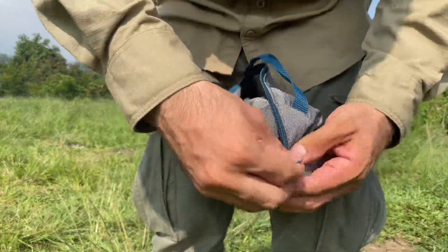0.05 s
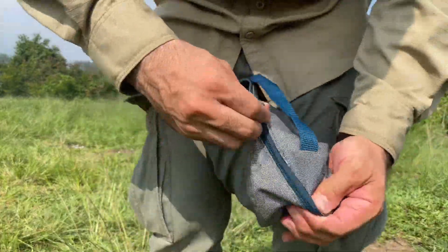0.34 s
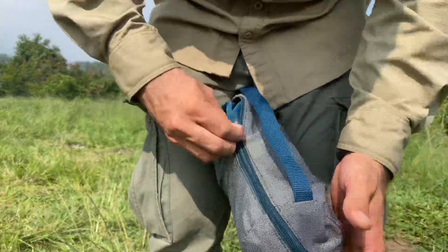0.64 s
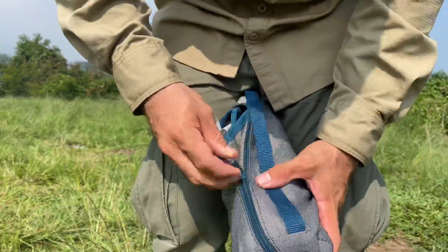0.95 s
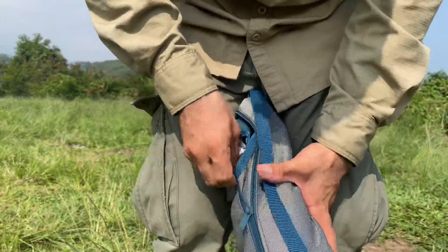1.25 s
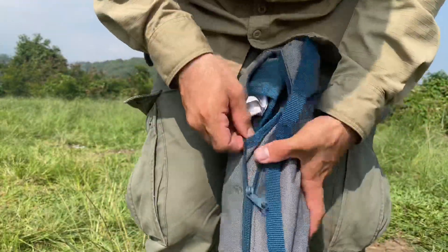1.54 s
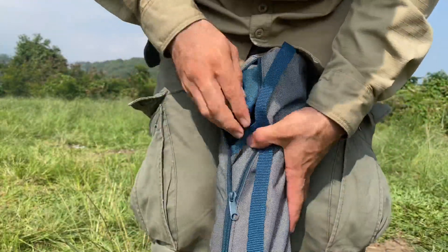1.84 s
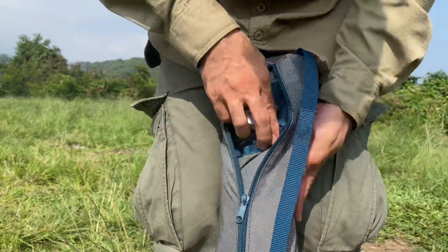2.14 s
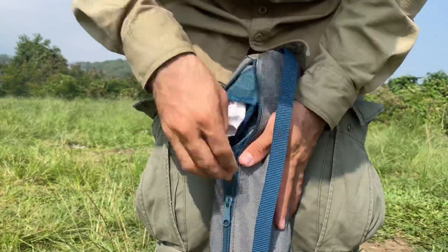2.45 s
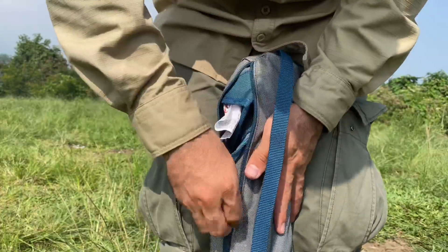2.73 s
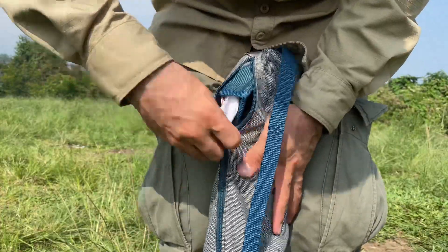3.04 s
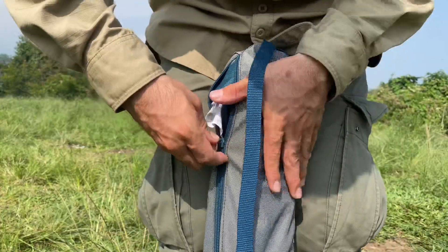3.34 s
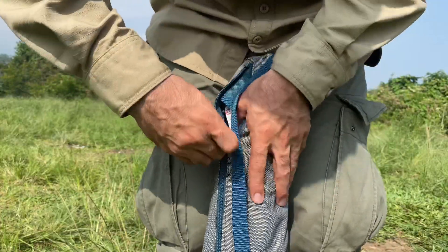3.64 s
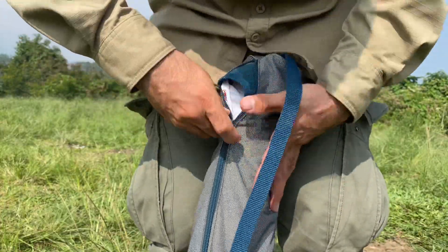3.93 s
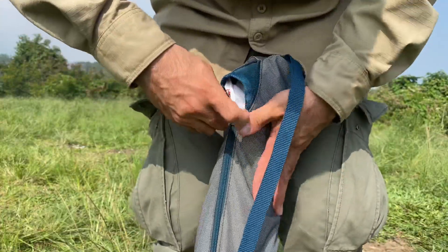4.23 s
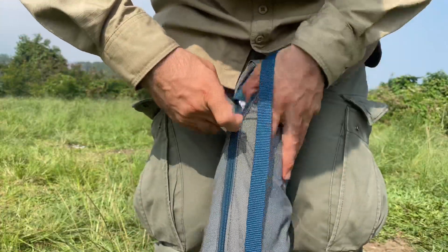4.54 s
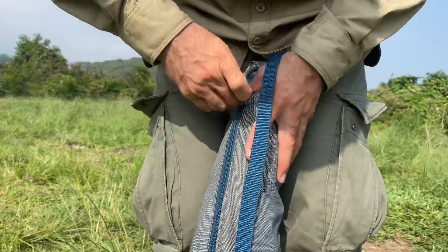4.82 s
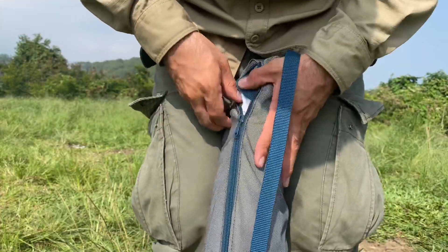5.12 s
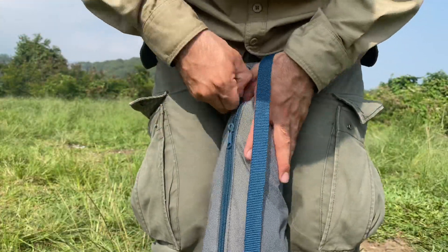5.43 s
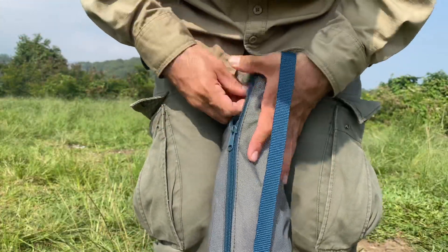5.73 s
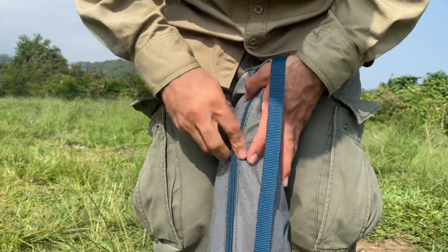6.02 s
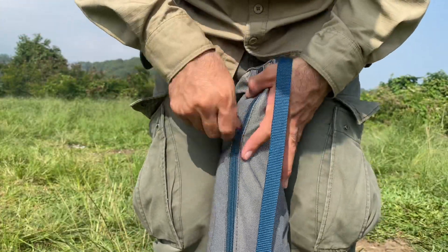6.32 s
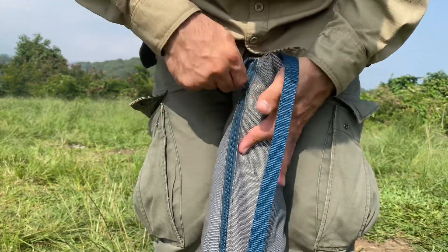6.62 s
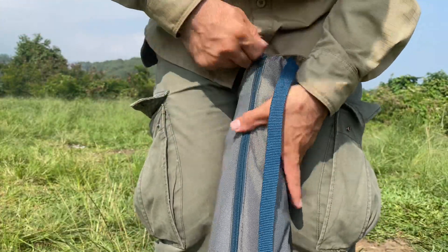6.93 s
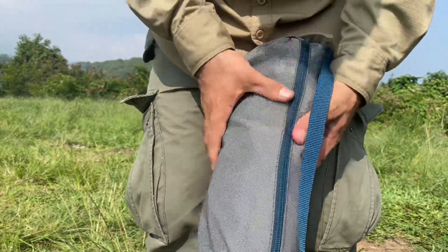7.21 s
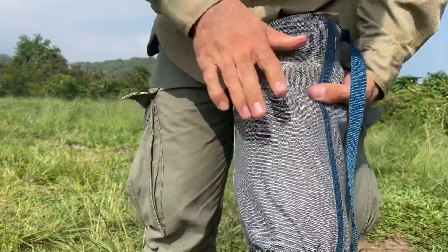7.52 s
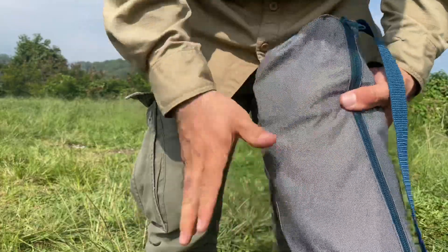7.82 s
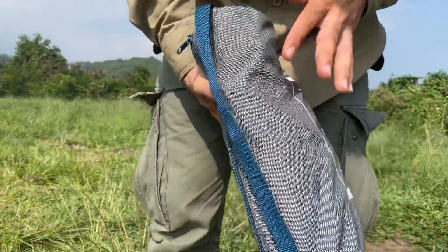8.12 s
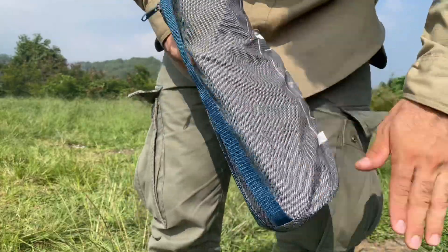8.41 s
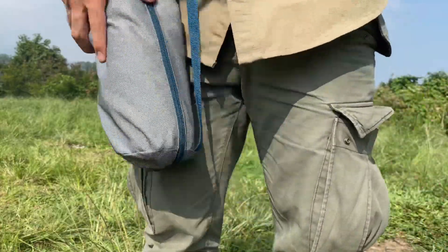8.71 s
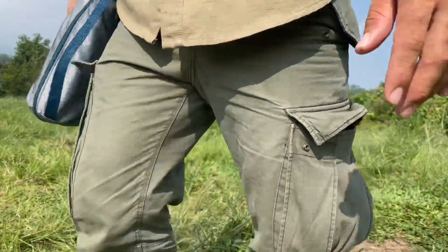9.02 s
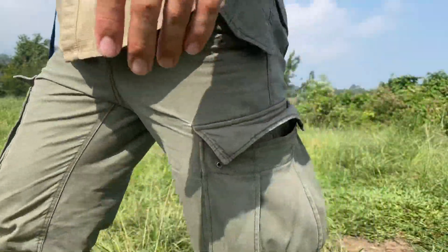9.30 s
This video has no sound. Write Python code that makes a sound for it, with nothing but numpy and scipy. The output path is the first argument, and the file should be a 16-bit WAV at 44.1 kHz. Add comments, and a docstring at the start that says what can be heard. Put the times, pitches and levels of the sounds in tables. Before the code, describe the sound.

Someone tugs a sticking zipper shut on a nylon bag, with close fabric rustling, jingling metal tabs and pats, over a light breeze.

```python
"""A meadow, a light breeze rumbling on a pair of microphones. Close by, someone works the sticking zip
of a nylon gear bag: the slider buzzes over the teeth, catches, and is tugged shut, brighter as the tape
pulls taut. Its metal tabs jingle and creases snap, while hands rub hiss and rustle out of the cloth.
Then the bag is smoothed, slapped with a dull boom and lifted away."""
import sys
import numpy as np
from scipy import signal
from scipy.fft import rfft, irfft, next_fast_len
from scipy.io import wavfile
from scipy.ndimage import uniform_filter1d, map_coordinates

SR = 44100
rng = np.random.default_rng(int(sys.argv[2]) if len(sys.argv) > 2 else 0)


def inscribe(sig):
    """Save sig as 16-bit PCM at rate SR to the path in sys.argv[1].

    A 1-D sig is mono; a 2-D sig holds one channel per row.
    Samples are clipped to [-1, 1] before scaling.
    """
    pcm = np.round(np.clip(np.atleast_2d(sig).T, -1, 1) * 32767)
    wavfile.write(sys.argv[1], SR, pcm.astype(np.int16))


N = 417186
TIME = np.arange(N) / SR

# The air: meadow wash, breeze rumble, deeper gusts. Each row: frequency in Hz, relative level in dB.
MEADOW_EQ = [(40, -35), (120, -2.5), (300, -4), (1000, -12.5), (3000, -21.5), (8000, -29), (15000, -75)]
BREEZE_EQ = [(15, -68), (30, -17), (48, -6), (66, 1), (95, -4), (140, -3.5), (220, -28.5), (500, -44)]
GUST_EQ = [(15, -29), (30, -13), (50, 2), (75, 1.5), (105, -6), (150, -15), (300, -43), (600, -59)]
# The breeze slackens, then freshens. Each row: time in seconds, lift in dB.
BREEZE_RIDE = [(0, 0.5), (2.3, 1.5), (4.2, -1), (5.4, 1), (6.2, 0), (7.2, 5.5), (9.46, 0.5)]
# Gusts buffet the microphones. Each row: centre in seconds, width in seconds, level in dB.
GUST_CUES = [(5.24, 0.11, -46), (5.37, 0.016, -39), (5.56, 0.064, -46), (5.82, 0.071, -42.5),
             (6.53, 0.22, -42), (6.83, 0.38, -42), (7.16, 0.068, -33), (7.27, 0.065, -40.5),
             (7.52, 0.034, -37), (7.67, 0.084, -37), (7.77, 0.099, -48), (7.93, 0.053, -46),
             (8.26, 0.058, -38), (8.43, 0.054, -47.5), (8.84, 0.06, -41.5), (8.97, 0.043, -51)]

# Sliding weave, bending folds and snapping creases. Each row: frequency in Hz, relative level in dB.
WEAVE_EQ = [(200, -15.5), (800, -3.5), (1600, -2.5), (2500, 0.5), (3700, 0), (5200, -4), (6400, -4),
            (7500, -5), (10200, -4.5), (11600, -8.5), (14800, -14), (16000, -43)]
FOLD_EQ = [(60, -61), (130, 2.5), (230, 0), (420, 2), (650, -4), (1100, -6.5), (1600, -10.5), (3000, -16.5),
           (8000, -69.5)]
CREASE_EQ = [(200, -16.5), (700, -11.5), (1500, 2), (2600, -2), (4200, -5.5), (7000, -14), (11000, -15.5),
             (15500, -22)]
# Stereo image of the cloth. Each row: frequency in Hz, likeness of left and right from 0 to 1.
CLOTH_LIKENESS = [(300, 0.94), (2000, 0.78), (4000, 0.77), (5200, 0.05), (6400, 0.4), (7400, 0),
                  (9400, 0.18), (10000, 0.64), (11200, .65), (12000, 1), (15000, 0.4)]
# The fingers never quite rest. Each row: time in seconds, activity in dB.
FIDGET_RIDE = [(0, -2), (1.8, 1.5), (2.55, -5), (2.72, -5.5), (3.06, -3.5), (3.7, -1), (4.2, -5.5),
               (5.1, -2.5), (5.72, -6), (6.25, -15), (7.3, 2.5), (8.17, -9), (8.6, -7.5), (9.46, -3.5)]
# A hand slides over the cloth. Each row: start and length in seconds, then relative hiss level,
# fold level and swell from start to end, all in dB.
STROKE_CUES = [(0.0, 0.043, -54.5, -51, 12), (0.119, 0.43, -52, -43, 6), (0.569, 0.14, -59.5, -48.5, -17),
               (0.695, 0.11, -57, -47, -2), (0.806, 0.35, -53, -51, 0), (1.157, 0.22, -53.5, -47.5, 2),
               (1.332, 0.38, -57.5, -56, -11), (1.708, 0.18, -64, -51.5, 2), (1.858, 0.11, -53, -52, 2),
               (2.018, 0.091, -65, -57, 5), (2.151, 0.13, -56.5, -48, -11), (2.267, 0.2, -57, -51, 7),
               (2.546, 0.11, -53.5, -44, -4), (2.837, 0.19, -55, -42, -8.5),
               (3.203, 0.24, -57.5, -47.5, -4), (3.462, 0.16, -62.5, -50.5, -10),
               (3.65, 0.16, -60, -43.5, 5), (3.786, 0.18, -57.5, -47.5, -10.5),
               (4.308, 0.12, -58.5, -51.5, 9), (4.417, 0.2, -58.5, -50, 2), (4.596, 0.16, -66, -50.5, -5),
               (4.803, 0.13, -62, -54, 3), (4.936, 0.2, -62, -48, -4), (5.2, 0.12, -59, -45.5, -5),
               (5.337, 0.21, -64.5, -54, -17), (5.517, .17, -57.5, -53, 17),
               (5.766, 0.16, -62, -51.5, -0.5), (5.958, 0.25, -67, -57.5, -5), (6.389, 0.1, -63, -54, -8),
               (6.482, 0.2, -56.5, -39, 0), (6.709, 0.069, -44, -41.5, -4), (6.758, 0.12, -53, -50.5, -16),
               (6.927, 0.27, -53.5, -50, 10), (7.133, 0.084, -57, -41.5, -9), (7.185, .18, -54, -53, -5),
               (7.392, 0.14, -57.5, -55, 14), (7.632, 0.09, -41, -33, -8), (7.693, 0.087, -38.5, -39, -1.5),
               (7.894, 0.044, -46, -34.5, -7), (7.914, 0.22, -52.5, -47.5, -3.5),
               (8.229, 0.077, -43.5, -40.5, -17), (8.288, 0.12, -42, -41.5, 7.5),
               (8.684, 0.19, -57.5, -49, -12.5), (8.842, 0.18, -61, -61, 5), (9.17, 0.28, -63, -56.5, -1)]
# A nail skates over the weave. Each row: centre and width in seconds, level in dB, ribs per second.
SCRAPE_CUES = [(2.224, 0.032, -39.5, 2150), (3.103, 0.017, -53.5, 4000), (6.756, 0.01, -49, 2100),
               (7.134, 0.028, -42, 2400), (7.685, 0.021, -42, 2000), (7.724, 0.023, -36.5, 5400),
               (7.991, 0.027, -42.5, 3100)]
# Dry ticks of slider, nails and creases. Each row: start in seconds, level in dB, decay in seconds,
# resonance in Hz.
TICK_CUES = [(1.099, -42, 0.0034, 1500), (1.115, -33, 0.00056, 2300), (1.214, -34.5, 0.0012, 2100),
             (1.288, -32, 0.0022, 2300), (1.302, -25, 0.0023, 1100), (1.421, -44, .0008, 2600),
             (1.826, -40, 0.0029, 1300), (2.044, -32.5, 0.00037, 2820), (2.104, -37.5, 0.0015, 1100),
             (2.296, -31, 0.00054, 3200), (2.306, -30, .0004, 2000), (2.337, -35, .0006, 3000),
             (2.351, -36, .0008, 2000), (2.570, -40, 0.001, 1800), (3.108, -35, 0.0021, 2200),
             (3.111, -32.5, 0.00076, 3600), (3.344, -46, .0007, 2410), (3.377, -35, .0008, 1800),
             (3.705, -40, .0004, 2900), (3.743, -41, .0004, 2400), (3.831, -35, 0.001, 1700),
             (3.881, -31.5, 0.0024, 2030), (3.908, -33, 0.0007, 2400), (4.046, -43.5, .0012, 1400),
             (4.248, -38, 0.0013, 2200), (4.479, -31.5, 0.0011, 2210), (4.512, -34.5, 0.0009, 3000),
             (4.53, -34, .002, 2500), (4.544, -42, 0.00036, 6000), (4.559, -30, 0.0006, 2700),
             (4.673, -42, .0012, 2200), (4.794, -40, .0004, 4040), (4.946, -34.5, 0.00093, 2000),
             (5.014, -35, .0006, 2500), (5.128, -44, .001, 1400), (5.247, -41, 0.00087, 2200),
             (5.272, -41, 0.0011, 1800), (5.282, -33, 0.0009, 1700), (5.318, -38, 0.00062, 2500),
             (6.028, -33.5, 0.0023, 1970), (6.22, -45, 0.00069, 3000), (6.317, -39.5, 0.0052, 2550),
             (6.716, -30, 0.0016, 2900), (7.028, -30, 0.0014, 3000), (7.157, -24.5, 0.0035, 1910),
             (7.435, -36, 0.0011, 2470), (7.844, -32, 0.00092, 2000), (7.903, -32.5, 0.0033, 2200),
             (7.921, -31, 0.0012, 2000), (7.992, -29, 0.0017, 2000), (8.238, -15.5, 0.0014, 2800),
             (8.245, -22, .0014, 1500), (8.452, -44, 0.0021, 1990)]
# The palm lands on the bag. Each row: start in seconds, relative level in dB, thud decay in seconds.
SLAP_CUES = [ (1.305, -30, 0.0028), (3.11, -35.5, 0.0035), (7.647, -22.5, 0.0049), (7.661, -31, 0.0042),
             (7.728, -25, 0.0023), (8.239, -17, 0.0057), (8.2446, -15, 0.0038)]
# The thud of the palm. Each row: frequency in Hz, relative level in dB.
THUD_EQ = [(40, -55), (110, -3), (240, 0), (340, 8.5), (480, -5), (700, -5.5), (1000, -7.5), (1500, -13),
           (2800, -19), (5000, -27), (12000, -33)]
# The boom of the packed bag. Each row: pitch in Hz, relative level in dB, seconds to fall 60 dB.
BAG_MODES = [(120, 8, 0.057), (245, 6, 0.065), (340, 7.5, 0.037), (703, 11, 0.038)]

# The metal tabs knock together. Each row: start in seconds, relative clink and ring levels in dB,
# multiplier on the ring time.
JINGLE_CUES = [(0.970, -56, -52, 1), (1.015, -67, -51, 1.1), (1.060, -31, -62, 0.46),
               (1.098, -33, -55, 0.62), (1.377, -63, -53, 0.89), (1.485, -37, -43, 0.35),
               (1.567, -48, -66, .4), (1.828, -38, -62, 0.45), (2.249, -47, -52, 0.78),
               (2.351, -40, -66, 0.44), (2.591, -53, -50, 1.1), (2.626, -34, -49, 0.55),
               (4.973, -53, -45, 1.1), (4.990, -50, -47, 0.87), (5.003, -54, -44, 1),
               (5.014, -39, -55, 0.46), (5.033, -57, -52, 1.3), (5.091, -49, -58, 0.72),
               (5.247, -37.5, -50, 0.67), (5.283, -47, -53, 1.1), (7.022, -35, -45, 0.96),
               (7.037, -39, -54, 0.45), (7.179, -43, -45, 0.78), (7.204, -33.5, -50, 0.71),
               (7.248, -36, -60, 0.48), (7.795, -51, -52, 0.79), (7.836, -31, -51, 0.56),
               (7.845, -27, -65, 0.43), (7.865, -40, -62, .3), (7.921, -29, -52, 0.58),
               (7.939, -36, -56, 1.1), (8.399, -39, -52, 0.88), (8.452, -29.5, -48, 0.38),
               (8.603, -51.5, -56, 2.7)]
# Modes of a free tab. Each row: pitch in Hz, relative level in dB, seconds to fall 60 dB,
# share that lingers from 0 to 1.
TAB_MODES = [(5690, 2, 0.065, .95), (9100, 0.5, 0.055, 0.7), (9900, 7, 0.062, 0.48),
             (10220, 2.5, 0.033, 0.3), (10730, 15.5, 0.0082, 0), (13850, 1, .11, 1), (14050, -3, .07, .85)]
# Single teeth and folds let go. Each row: start in seconds, relative level in dB, final pitch in Hz.
SNAP_CUES = [(0.587, -37, 478), (1.203, -33, 270), (1.224, -38, 263), (1.303, -27, 330), (2.042, -44, 377),
             (2.785, -37, 256), (3.232, -36, 253), (3.376, -30, 620), (3.403, -28, 356), (3.68, -45, 480),
             (3.772, -40, 480), (4.130, -31, 495), (4.147, -31, 416), (4.617, -35, 800),
             (4.622, -30.5, 400), (4.639, -30, 440), (4.652, -28.5, 460), (4.665, -31.5, 600),
             (4.682, -31, 447), (4.705, -34.5, 298), (4.752, -39, 430), (4.968, -36.5, 494),
             (5.028, -35.5, 446), (5.082, -40, 409), (5.228, -33, 436), (5.268, -33.5, 406),
             (5.355, -29.5, 334), (5.361, -34, 318), (5.451, -44.5, 397), (5.646, -40, 415),
             (5.665, -39.5, 417), (6.029, -40, 197), (6.22, -44.5, 405), (6.319, -32.5, 266),
             (6.49, -32.5, 386), (6.503, -27, 420), (6.569, -25, 430), (6.579, -21, 416), (6.586, -24, 420),
             (6.671, -36, 435), (6.702, -35, 375), (7.905, -37, 357)]
# A tooth heard through slack, taut and stretched cloth. Each row: frequency in Hz, gain in dB.
SLACK_EQ = [(60, -47), (150, -14), (270, 10), (340, 3.5), (450, 1), (600, -22), (800, -30), (1000, -25),
            (1200, -21), (1500, -22.5), (2500, -10.5), (5000, -82), (15000, -55)]
TAUT_EQ = [(60, -54), (170, -8), (300, 3), (450, 3.5), (700, -7.5), (1000, -7), (1300, -24.5), (1600, -19),
           (2500, -17), (5000, -38), (15000, -53)]
STRETCHED_EQ = [(100, -41), (400, -43), (700, -5.5), (1250, -12.5), (1800, -7.5), (2800, -8), (5000, -35),
                (15000, -39)]
# One table for each pull of the slider. Each row: time in seconds, teeth per second, level in dB,
# tape tension (0 slack, 1 taut, 2 stretched).
ZIP_PULLS = [
    [(.125, 148.5, -53, 0.0056), (.165, 213, -47, 0.19), (.195, 245, -29, 0.21), (.232, 342.4, -25, 0.18),
     (.27, 277.4, -28.5, 0), (.29, 196, -28, 0.00023)],
    [(.29, 198.6, -40, 0.049), (.312, 221.3, -32.5, 0.035), (.337, 278.4, -22.5, 0.019),
     (.365, 254.2, -21, 0.28), (.392, 262.6, -19.5, 0.23), (.411, 292.3, -20, 0.19),
     (.425, 339.3, -18.5, 0.28), (.455, 345, -25, 0.3), (.476, 437.6, -25, 0.59), (.488, 599.5, -29, 1.8),
     (.503, 600, -37, 1.84), (.514, 445, -30.5, 1.8), (.529, 327, -31, 0.71), (.54, 217, -53, 0.52)],
    [(.61, 139.8, -52, 0.19), (.675, 186.7, -39, 0.1), (.75, 170.7, -48, 0.47), (.79, 134.3, -54, 0.096),
     (.84, 161.3, -41.5, 0.23), (.885, 129, -55, 0.23)],
    [(1.27, 146.6, -49, 0.58), (1.292, 262, -36.5, 0.92), (1.307, 340, -43, 0.9), (1.318, 170, -62, 0.17)],
    [(2.838, 151, -48, 1.1), (2.847, 190, -44, 1.03), (2.858, 225.6, -34, 1.02), (2.884, 295.4, -32, 1.18),
     (2.895, 356.5, -39, 0.89), (2.908, 317.5, -36, .9), (2.925, 209.2, -46, 0.77), (2.952, 289, -36, 0.38),
     (2.978, 283.3, -34.5, .45), (2.998, 189, -39.5, 0.86), (3.008, 131, -62, .6)],
    [(3.655, 109.9, -59, 0.24), (3.70, 168.8, -36, 0.56), (3.725, 158, -45, 0.1), (3.752, 183.7, -33, 1),
     (3.77, 140, -59, 0.51), (3.785, 112, -60, .5)],
    [(6.510, 136.2, -24.5, 1.15), (6.52, 188.7, -25, 0.61), (6.537, 259, -22, 0.87),
     (6.548, 146.6, -26.5, 1.47), (6.566, 80, -39, 0.65)],
    [(6.593, 169, -24.5, 0.76), (6.609, 228.3, -27, 0.93), (6.614, 505, -26, 0.97),
     (6.622, 534, -23.5, 1.6), (6.635, 420, -26.5, 0.44), (6.648, 382, -27, 0.41), (6.662, 194, -53, 0.54)],
    [(6.710, 258, -46, 0.95), (6.719, 340, -30, 0.78), (6.726, 640, -37, 1.8), (6.738, 733, -39, 1.8),
     (6.757, 656, -38, 2.5), (6.772, 480, -46, 0.82)],
]

# Where the hands sit in the image. Each row: time in seconds, delay of the right side in samples.
HAND_PAN = [(0, -1), (1.2, 1.2), (1.9, -0.4), (2.7, 0.5), (3.6, -0.5), (4.8, 0.65), (7.3, 1), (7.7, -1),
            (8.35, 0.1), (8.7, 4.5), (9.46, 6)]
# The pair's own phase pattern. Each row: frequency in Hz, lead of the left side in radians.
MIC_PHASE = [(0, 0), (1600, .25), (3200, 1.6), (4600, 1.3), (5300, 2.4), (6000, .4), (7000, .2),
             (7600, -2.1), (9000, -4.9), (10000, -6.3), (11000, -7.6), (12200, -9.4), (13300, -12.5),
             (14500, -12.6), (15500, -15.7)]
# The right microphone is a little more present. Each row: frequency in Hz, dB above the left.
MIC_BALANCE = [(100, 1), (1000, -0.05), (2000, 0.4), (4000, 0.9), (8000, -0.5), (15000, 1.5)]


def amp(db):
    """Decibels to gain."""
    return 10 ** (np.asarray(db) / 20)


def unit_rms(x):
    """Scales to an rms of one."""
    return x / np.sqrt(np.mean(x ** 2) + 1e-20)


def unit_peak(x):
    """Scales to a peak of one."""
    return x / abs(x).max()


def at_hz(points, hz):
    """Reads a curve on a log-frequency axis."""
    f, value = np.transpose(points)
    return np.interp(np.log(hz + 1), np.log(f + 1), value)


def automation(rows, t):
    """Each column of a timed table, ramped between its points, at the times t."""
    times, *columns = np.transpose(rows)
    return [np.interp(t, times, column) for column in columns]


def add(mix, start, sound):
    """Drops a sound into the mix at start seconds."""
    part = mix[max(round(start * SR), 0):][:len(sound)]
    part += sound[:len(part)]


def eq(x, spectrum, size=4096):
    """Minimum-phase EQ: a click rings out through the given spectrum."""
    log_gain = np.log(amp(at_hz(spectrum, abs(np.fft.fftfreq(size, 1 / SR)))))
    ring = np.fft.ifft(np.exp(np.conj(signal.hilbert(log_gain)))).real[:size // 2]
    return signal.oaconvolve(x, ring)[:len(x)]


def bell(hz, skirt_db):
    """EQ curve of a broad resonance, at skirt_db half an octave to either side."""
    return [(hz / 8, 2 * skirt_db), (hz / 1.4, skirt_db), (hz, 0),
            (hz * 1.4, skirt_db), (hz * 8, 1.5 * skirt_db)]


def wander(per_s):
    """Smooth random modulation of rms one, rolling off above per_s changes a second."""
    spectrum = rfft(rng.standard_normal(N))
    return unit_rms(irfft(spectrum * np.exp(-(np.fft.rfftfreq(N, 1 / SR) / per_s) ** 2), N))


def burst(noise, decay_s, spectrum):
    """A puff of noise that swells and dies quickly, with a peak of one."""
    age = np.arange(len(noise)) / SR / decay_s
    return unit_peak(eq(np.sign(noise) * np.sqrt(age) * np.exp(-age), spectrum))


def air_pair(spectrum, lean_db=0, shared=.93):
    """Eddies reach the two microphones partly alike; lean_db tips them to the left."""
    left, right, both = [unit_rms(eq(noise, spectrum)) for noise in rng.standard_normal((3, N))]
    return unit_rms(np.array([left * amp(lean_db), right * amp(-lean_db)]) + shared * both)


def outdoors(meadow_db=-61, breeze_db=-54, sway_db=1.2):
    """The bed: a swaying breeze and bell-shaped gusts rumble over the faint wash of the meadow."""
    breeze = amp(breeze_db + automation(BREEZE_RIDE, TIME)[0] + sway_db * wander(8))
    gust_power = sum(amp(db) ** 2 * np.exp(-np.minimum((2 * (TIME - centre) / width) ** 2, 20))
                     for centre, width, db in GUST_CUES)
    return (breeze * air_pair(BREEZE_EQ) + np.sqrt(gust_power) * air_pair(GUST_EQ, lean_db=2)
            + amp(meadow_db) * air_pair(MEADOW_EQ))


def handling(idle_hiss_db=-63, idle_fold_db=-55, attack_s=.021, release_s=.025, arch_db=3):
    """Envelopes for hiss and folds: strokes arch with the hand's speed over a floor of fidgeting."""
    fidget_db = automation(FIDGET_RIDE, TIME)[0] - 2 * wander(63)
    power = amp([idle_hiss_db + fidget_db, idle_fold_db + fidget_db]) ** 2
    for start, length, hiss_db, fold_db, swell_db in STROKE_CUES:
        t = np.arange(0, length, 1 / SR)
        from_middle = t / length - .5
        contact = np.minimum(t / attack_s, 1) * np.minimum((length - t) / release_s, 1)
        speed_db = swell_db * from_middle - arch_db * (2 * from_middle) ** 2
        for layer, db in zip(power, (hiss_db, fold_db)):
            add(layer, start, (contact * amp(db + speed_db)) ** 2)
    return np.sqrt(power)


def grains(per_s, spread_db):
    """Tiny random slips; spread_db makes a few stand out from the rest."""
    sizes = amp(spread_db * np.minimum(rng.exponential(1, N), 4))
    return unit_rms(sizes * rng.choice([-1, 1], N) * (rng.random(N) < per_s / SR))


def drift(x, depth_db):
    """The cloth changes shape as it moves, so broad patches of its colour come and go."""
    frames = signal.stft(x, nperseg=512)[2]
    patches = uniform_filter1d(rng.standard_normal(frames.shape), size=22, axis=0)
    patches = uniform_filter1d(patches, size=12, axis=1)
    return signal.istft(frames * amp(depth_db * unit_rms(patches)), nperseg=512)[1][:N]


def rustle(slide, bend, grip, hiss_db=5, crease_db=-3):
    """Threads slip in a gritty hiss, folds buckle in coarser grains and creases snap."""
    threads = grains(per_s=3500, spread_db=4.5) + .6 * rng.standard_normal(N)
    threads = drift(threads * amp(.96 * grip), depth_db=1.3)
    hiss = unit_rms(eq(threads, WEAVE_EQ))
    folds = unit_rms(eq(grains(per_s=1500, spread_db=0) * amp(2 * grip), FOLD_EQ))
    creases = unit_rms(eq(drift(grains(per_s=110, spread_db=3.5), depth_db=4), CREASE_EQ))
    # a sliding hand holds the cloth flat, so creases snap no louder in a fast stroke
    held_flat = np.minimum(slide, amp(-56))
    return hiss * slide * amp(hiss_db) + folds * bend + creases * held_flat * amp(crease_db)


def cloth():
    """Hands rub with a grip that comes and goes; the cloth is broad, so its rustle is wide."""
    slide, bend = handling()
    grip = wander(33)
    alike = np.clip(at_hz(CLOTH_LIKENESS, np.fft.rfftfreq(N, 1 / SR)), 0, 1)
    mid, side = [irfft(rfft(rustle(slide, bend, grip)) * np.sqrt(share), N)
                 for share in ((1 + alike) / 2, (1 - alike) / 2)]
    return np.array([mid + side, mid - side])


def nail_scrapes():
    """A nail trips over the ribs of the weave: a short zizz around the rate at which they pass."""
    out = np.zeros(N)
    for centre, width, db, ribs_per_s in SCRAPE_CUES:
        noise = rng.standard_normal(SR // 5)
        t = np.arange(len(noise)) / SR - 2 * width
        zizz = unit_rms(eq(eq(noise, WEAVE_EQ), bell(ribs_per_s, skirt_db=-6)))
        add(out, centre - 2 * width, amp(db) * np.exp(-2 * (t / width) ** 2) * zizz)
    return out


def ticks(trim_db=1, lead_in_db=-21, lead_in_s=.0015, crackle_db=-16, crackle_s=.0069):
    """Slider, nails and creases tick: a faint hiss swells into each crack, then the cloth crackles on."""
    out = np.zeros(N)
    age = np.arange(SR // 20) / SR / crackle_s
    tone = [(200, 6.5), (1300, 8), (3000, 3.5), (6000, -1.5), (10500, -1.5), (15500, -13.5)]
    for start, db, decay_s, hz in TICK_CUES:
        noise = rng.standard_normal(len(age))
        lead_in = burst(noise[::-1], lead_in_s, WEAVE_EQ)[::-1]  # reversed, to swell into the crack
        crack = unit_peak(eq(burst(noise, decay_s, tone), bell(hz, skirt_db=-5)))
        crackle = unit_peak(eq(noise * abs(noise) * np.sqrt(age) * np.exp(-age), tone))
        add(out, start - len(lead_in) / SR, amp(db + lead_in_db) * lead_in)
        add(out, start, amp(db + trim_db) * (crack + amp(crackle_db) * crackle))
    return out


def slaps(thud_db=-2, boom_db=-6, press_s=.005):
    """The palm lands with a thud, and the packed bag booms briefly as it presses home."""
    out, t = np.zeros(N), np.arange(SR // 10) / SR
    modes = sum(amp(db - 60 * t / t60) * np.sin(2 * np.pi * hz * t) for hz, db, t60 in BAG_MODES)
    boom = unit_peak((1 - np.exp(-(t / press_s) ** 2)) * modes)
    for start, db, decay_s in SLAP_CUES:
        thud = burst(rng.standard_normal(len(t)), decay_s, THUD_EQ)
        add(out, start, amp(db) * (amp(thud_db) * thud + amp(boom_db) * boom))
    return out


def pull_tabs(clink_trim_db=-3, ring_trim_db=3, spread_db=2, detune=.003, click_db=-7, click_s=.0015):
    """The metal tabs clink and a few modes ring on; each knock lands elsewhere and favours other modes."""
    out, t = np.zeros(N), np.arange(SR // 5) / SR
    hz, mode_db, t60, lingers = np.transpose(TAB_MODES)[:, :, None]
    attack = 1 - np.exp(-t / .0012)
    click_tone = [(1500, -2), (6000, 10), (10500, 8), (15500, 6)]
    for start, clink_db, ring_db, ring_scale in JINGLE_CUES:
        favour, shift = rng.standard_normal((2, len(TAB_MODES), 1))
        strike_db = (1 - lingers) * (clink_db + clink_trim_db) + lingers * (ring_db + ring_trim_db)
        fade = attack * amp(mode_db + spread_db * favour + strike_db - 60 * t / (t60 * ring_scale))
        # the loose tabs chatter against the slider, which roughens each ring
        real, imag = uniform_filter1d(rng.standard_normal((2, len(TAB_MODES), len(t))), size=130)
        chatter = .68 + .52 * (unit_rms(real) + 1j * unit_rms(imag))
        modes = fade * chatter * np.exp(2j * np.pi * hz * (1 + detune * shift) * t)
        click = amp(clink_db + click_db) * burst(rng.standard_normal(len(t)), click_s, click_tone)
        add(out, start, click + modes.imag.sum(0))
    return out


def disperse(x, delay_s, corner_hz=750):
    """Bending waves cross cloth treble first, so each click is smeared out."""
    size = next_fast_len(len(x) + 2048)
    hz = np.fft.rfftfreq(size, 1 / SR)
    phase = 2 * np.pi * delay_s * corner_hz * np.arctan(hz / corner_hz)
    return irfft(rfft(x, size) * np.exp(-1j * phase), size)[:len(x)]


def snaps(trim_db=2, ring_s=.0018, overshoot=.9, sink_s=.0012, scuff_db=-13, scuff_s=.0006):
    """A tooth or fold lets go with a crack and a scuff; the taut cloth answers with a falling chirp."""
    out, t = np.zeros(N), np.arange(2048) / SR
    for start, db, hz in SNAP_CUES:
        noise = rng.standard_normal(len(t))
        push = (t == 0) + .08 * noise * np.exp(-t / .004)
        crack = unit_peak(eq(disperse(push, delay_s=.0024), TAUT_EQ))
        cycles = np.cumsum(hz * (1 + overshoot * np.exp(-t / sink_s))) / SR
        chirp = t / ring_s * np.exp(1 - t / ring_s) * np.sin(2 * np.pi * cycles)
        scuff = amp(scuff_db) * burst(noise, scuff_s, WEAVE_EQ)
        add(out, start, amp(db + trim_db) * unit_peak(.85 * crack + chirp + scuff))
    return out


def unevenness(rate, tension, stumble=.9, steady_teeth_per_s=230):
    """In slack tape a slow slider stumbles and a fast one runs evenly; tension sets its own roughness."""
    slack = .03 + stumble / (1 + (rate / steady_teeth_per_s) ** 8)
    tight = np.interp(tension, [1, 2], [.28, .011])
    return slack + np.clip(tension, 0, 1) * (tight - slack)


def zipper(jitter=.24, scatter_db=6, rasp_share=.34, stretched_rasp_db=-8, tick_db=-48.5):
    """The slider trips over tooth after tooth; tension brightens the cloth that sounds them."""
    out, sway, scatter, hiss = np.zeros(N), wander(260), wander(280), rng.standard_normal(N)
    for pull in ZIP_PULLS:
        start, end = pull[0][0], pull[-1][0]
        span = (TIME >= start) & (TIME < end)
        rate, db, tension = automation(pull, TIME[span])
        uneven = unevenness(rate, tension)
        teeth = np.cumsum(rate * np.exp(jitter * uneven * sway[span])) / SR
        clicks = np.diff(np.floor(teeth), prepend=-1) * amp(scatter_db * uneven * scatter[span])
        push = eq(unit_rms(clicks), [(300, -2.5), (1200, 3.0), (2500, -14.5), (6000, 0.5)])
        # each tooth rasps along the slider, less so in a hard pull or in stretched cloth
        grit = unit_rms(hiss[span] * (1 - teeth % 1) ** 6)
        rasp = eq(grit, [(250, -15.5), (480, 10.5), (2300, -7), (5000, 6)])
        taut, stretched = np.clip(tension, 0, 1), np.clip(tension - 1, 0, 1)
        rasp_db = stretched_rasp_db * stretched - .35 * taut * np.maximum(db + 36, 0)
        drive = disperse(push + rasp_share * (.36 + uneven) * amp(rasp_db) * rasp, delay_s=.0032)
        # tension crossfades the three cloth colours
        buzz = sum(np.maximum(1 - abs(np.clip(tension, 0, 2) - k), 0) * eq(drive, body)
                   for k, body in enumerate([SLACK_EQ, TAUT_EQ, STRETCHED_EQ]))
        running_rms = np.sqrt(abs(uniform_filter1d(buzz ** 2, size=520)) + 1e-9)
        # in taut tape each tooth also ticks on the slider, growing more slowly than the buzz
        tick_gain = np.interp(tension, [0, 1, 2], [0, 1, .3]) * amp(tick_db + .77 * (db + 33))
        add(out, start, amp(db) * buzz / running_rms + tick_gain * unit_rms(eq(grit, WEAVE_EQ)))
    return out


def microphones(pair, pan_below_hz=5340):
    """Lows and mids shift in time on the right as the hands move; the pair adds its own phase pattern."""
    left, right = rfft(pair)
    hz = np.fft.rfftfreq(N, 1 / SR)
    right = right * np.exp(-1j * np.interp(hz, *np.transpose(MIC_PHASE)))
    lowpass = 1 / (1 + (hz / pan_below_hz) ** 16)
    delay = automation(HAND_PAN, TIME)[0]
    panned = map_coordinates(irfft(right * lowpass, N), [np.arange(N) - delay], order=3)
    return np.array([irfft(left, N), panned + irfft(right * (1 - lowpass), N)])


def scene():
    """The bag up close, over the open-air bed."""
    bag = zipper() + snaps() + ticks() + slaps() + nail_scrapes() + pull_tabs() + cloth()
    return microphones(bag) + outdoors()


def record(dry, top_hz=15900):
    """Each microphone gets its own slight colour, then a steep high cut trims the top."""
    heard = np.array([eq(channel, [(hz, side * db / 2) for hz, db in MIC_BALANCE])
                      for channel, side in zip(dry, (-1, 1))])
    high_cut = signal.firwin(255, top_hz, window=("kaiser", 9), fs=SR)
    return signal.oaconvolve(heard, high_cut[None], "same")


dry = scene()
out = record(dry)
inscribe(out)
```